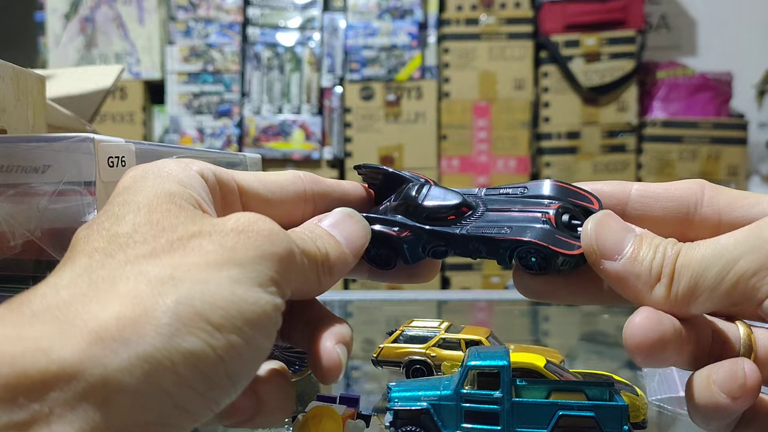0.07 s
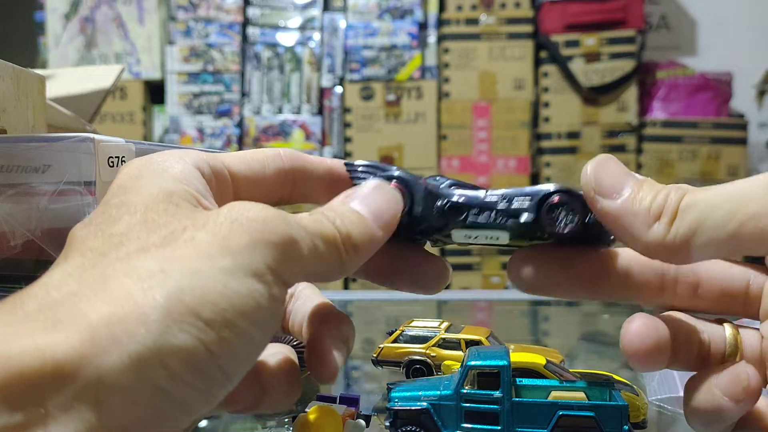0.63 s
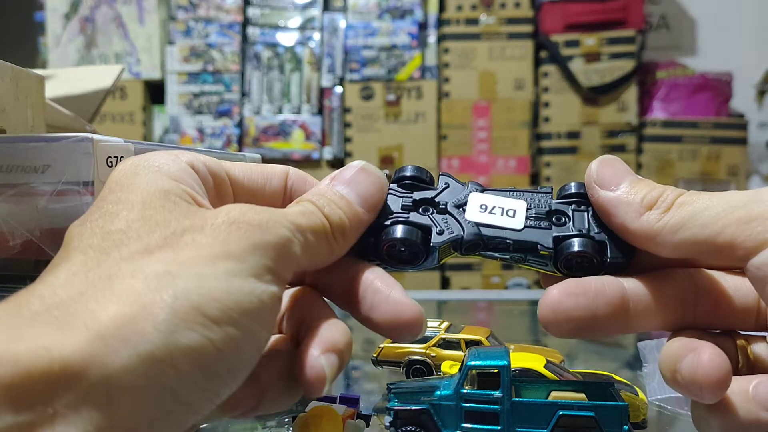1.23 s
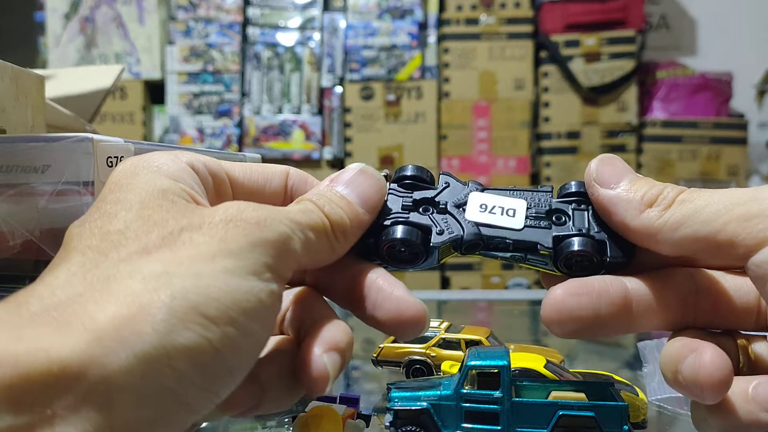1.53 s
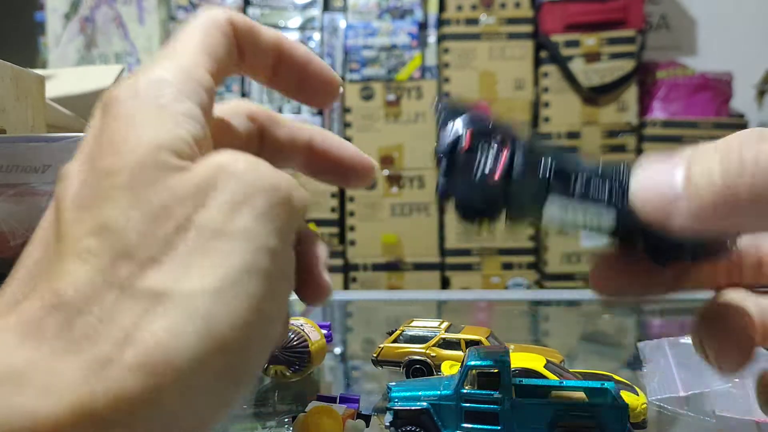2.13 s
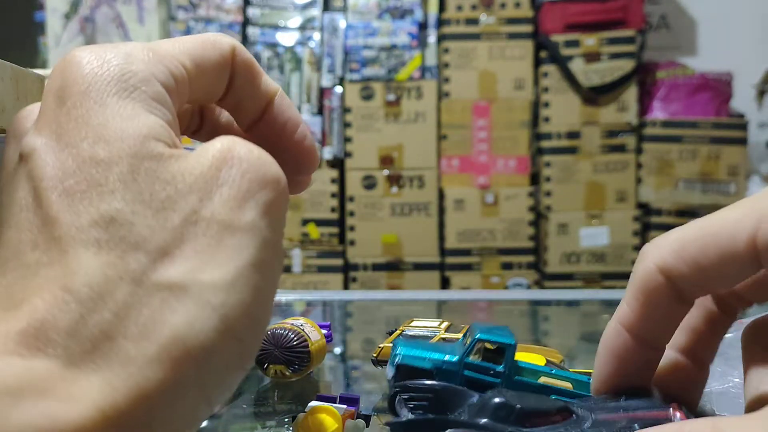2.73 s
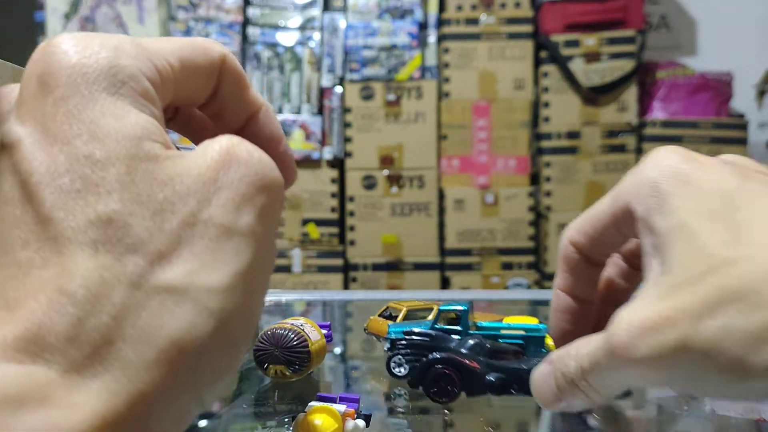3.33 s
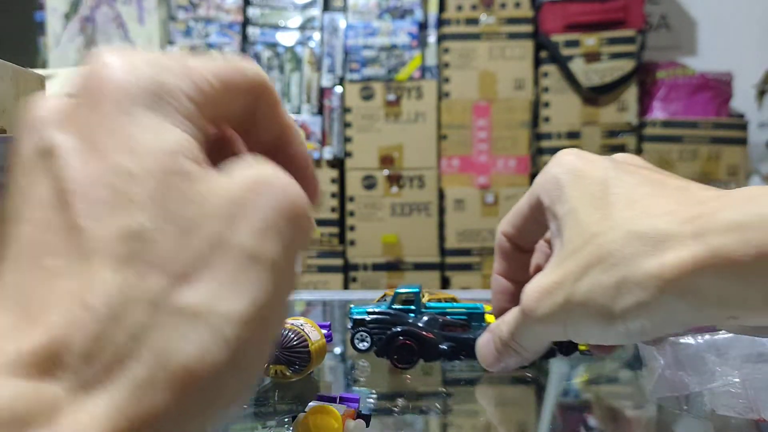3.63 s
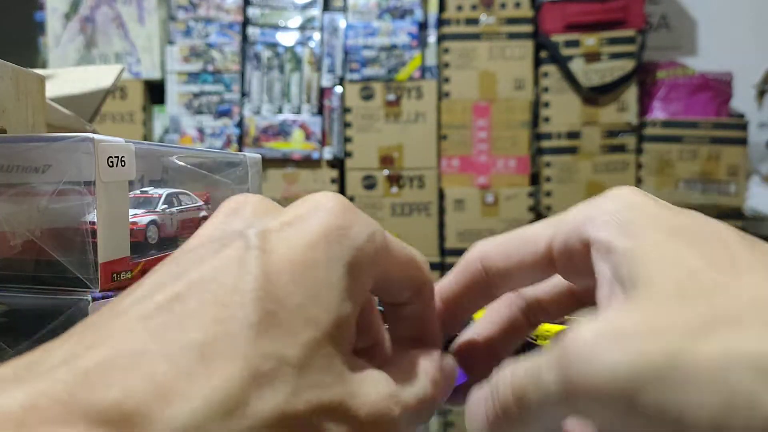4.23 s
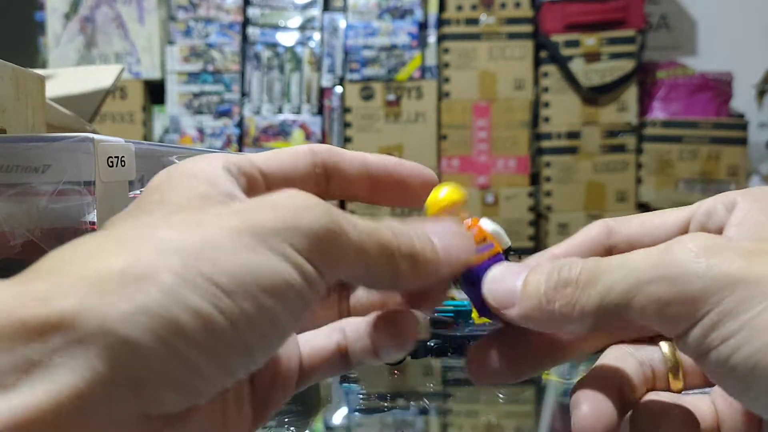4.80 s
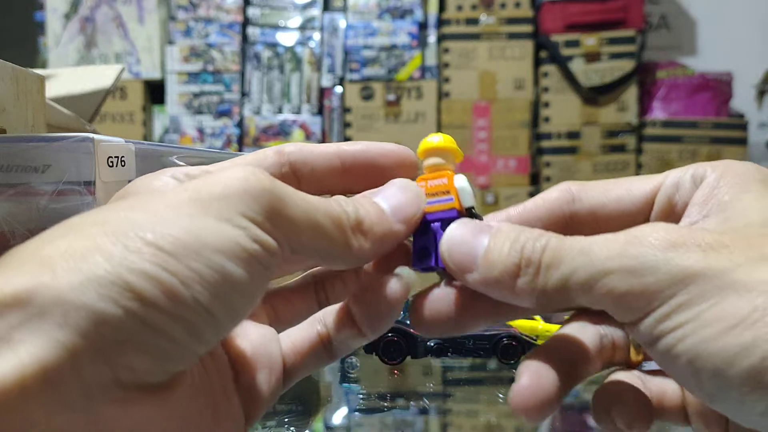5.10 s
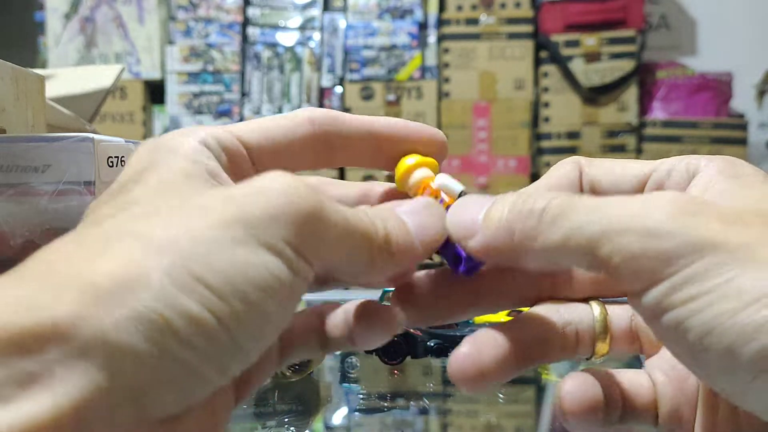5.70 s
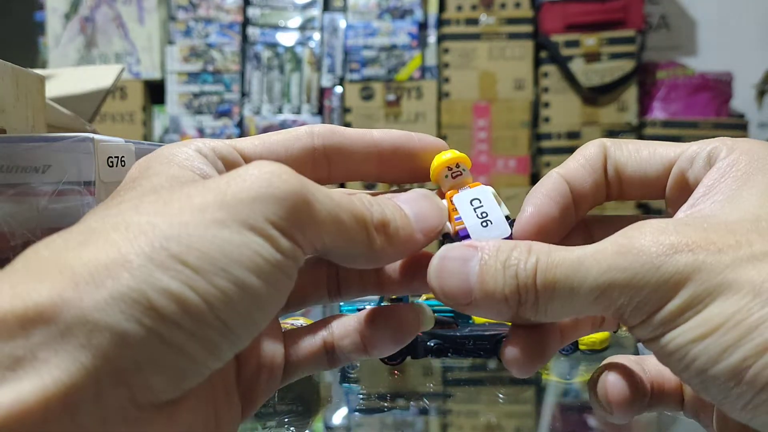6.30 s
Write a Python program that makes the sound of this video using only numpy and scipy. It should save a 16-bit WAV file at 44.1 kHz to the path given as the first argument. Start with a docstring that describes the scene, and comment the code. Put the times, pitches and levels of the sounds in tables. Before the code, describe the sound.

Sharp clicks and taps of a toy car set on glass, a few plastic ticks, and motorbikes puttering past outside.

```python
"""In a small shop, over the rumble of the town, fingers rub and tick against a diecast toy car.
Distant motorbikes putter by and a thin whine comes and goes. From 2.4 s the car is set on a glass shelf
and nudged into place: its metal body clashes and rings, loose wheels rattle and roll, the shelf thumps.
Near 3.9 s a plastic figure is picked up with a few light ticks. The exhaust pulses of a close motorbike
swell, pass at about 4.6 s and fade as more traffic draws near."""
import sys
import numpy as np
from scipy import signal
from scipy.fft import rfft, irfft
from scipy.io import wavfile
from scipy.ndimage import uniform_filter1d

SR = 44100
rng = np.random.default_rng(int(sys.argv[2]) if len(sys.argv) > 2 else 0)


def store_pcm(level_fs):
    """Save levels as 16-bit WAV."""
    pcm = np.round(np.clip(level_fs, -1, 1) * 32767).astype(np.int16)
    wavfile.write(sys.argv[1], SR, np.atleast_2d(pcm).T)


N = 288855
TIME, FREQ_HZ = np.arange(N) / SR, np.fft.rfftfreq(N, 1 / SR)


def gain_of(db):
    return 10 ** (np.asarray(db) / 20)


def unit_rms(x):
    return x / np.sqrt(np.mean(x ** 2) + 1e-20)


def pan(left_db):
    return gain_of(np.array([[left_db], [-left_db]]) / 2)


def at_hz(points, hz):
    """Interpolates a table on a log-frequency axis."""
    f, value = np.transpose(points)
    return np.interp(np.log(hz + 1), np.log(f + 1), value)


def envelope(rows):
    """Gain curve through (s, dB) points, silent outside their span."""
    s, db = np.transpose(rows)
    gate = 1. * ((TIME >= s[0] - .04) & (TIME <= s[-1] + .04))
    return gain_of(np.interp(TIME, s, db)) * uniform_filter1d(gate, size=2000)


def add(mix, start_s, sound):
    part = mix[:, max(round(start_s * SR), 0):][:, :sound.shape[1]]
    part += sound[:, :part.shape[1]]


def coloured(x, colour):
    """Filters x by a (Hz, dB) table; rms 1."""
    return unit_rms(irfft(rfft(x) * gain_of(at_hz(colour, FREQ_HZ)), N))


def minimum_phase(db):
    """Shortest impulse response with this gain over the rfft bins."""
    log_gain = np.log(gain_of(np.r_[db, db[-2:0:-1]]))
    return np.fft.ifft(np.exp(np.conj(signal.hilbert(log_gain)))).real


def wander(cutoff_hz):
    """Slow random drift; rms 1."""
    return unit_rms(irfft(rfft(rng.standard_normal(N)) / (1 + (FREQ_HZ / cutoff_hz) ** 4), N))


def passing(nearest_s, away_s, db, falloff=1.72):
    """Gain of a passing vehicle; screened by the shop front, it drops as distance ** -falloff."""
    return gain_of(db) / np.hypot(1, (TIME - nearest_s) / away_s) ** falloff


def power_sum(passes):
    return np.sqrt(sum(passing(*row) ** 2 for row in passes))


def heading(nearest_s, away_s):
    """-1 approaching, 0 beside the shop, 1 leaving."""
    return (TIME - nearest_s) / np.hypot(away_s, TIME - nearest_s)


# Diffuse field. Each row: frequency in Hz, left-right coherence.
COHERENCE = [(100, 1), (300, 0.97), (640, 1), (1400, 0.29), (3000, 0.015), (7000, 0.084)]
def diffuse_noise(colour):
    """Noise alike at both microphones in the bass, less so above."""
    left, other = rfft(rng.standard_normal((2, N)))
    same = np.clip(at_hz(COHERENCE, FREQ_HZ), -1, 1)
    right = same * left + np.sqrt(1 - same ** 2) * other
    return coloured(irfft(np.array([left, right]), N), colour)


# Rumble spectrum. Each row: frequency in Hz, relative density in dB.
RUMBLE_SPECTRUM = [(20, -47), (40, -44), (55, -18), (85, -11.5), (125, 1), (160, -9.5), (240, -10),
                   (330, -20), (500, -26), (1000, -119.5)]
def town_rumble():
    """The town's constant, slightly wavering bass."""
    return diffuse_noise(RUMBLE_SPECTRUM) * gain_of(-48 + 1.5 * wander(4.4))


# Roar spectrum. Each row: frequency in Hz, relative density in dB.
ROAR_SPECTRUM = [(150, 1.5), (280, 7), (450, 3), (700, -1.5), (1200, -5), (1900, -9), (2600, -8.5),
                 (3300, -20.5), (4000, -60), (8000, -20), (11000, -51)]
def traffic_roar():
    """A constant floor plus a broad swell of traffic around the near bike."""
    swell = np.hypot(gain_of(-55), passing(nearest_s=4.46, away_s=2.52, db=-50.5))
    return diffuse_noise(ROAR_SPECTRUM) * swell * gain_of(0.75 * wander(20))


# Approaching traffic. Each row: time in seconds, level in dB.
FOLLOWING_LEVELS = [(2.8, -84), (4.2, -55), (6.55, -51.5)]
# Its spectrum. Each row: frequency in Hz, relative density in dB.
FOLLOWING_SPECTRUM = [(200, 1), (310, -9), (420, 2), (560, 3.5), (780, -0.5), (1050, -6), (1600, -30),
                      (3000, -36)]
def following_traffic():
    """Traffic draws nearer behind the near bike."""
    return diffuse_noise(FOLLOWING_SPECTRUM) * envelope(FOLLOWING_LEVELS) * gain_of(1.1 * wander(11))


# Distant vehicles. Each row: nearest time in seconds, time to draw away in seconds, level in dB.
TYRE_PASSBYS = [(1.9, 0.61, -55.5), (5.8, 3.8, -57.5)]
# Tyre spectrum. Each row: frequency in Hz, relative density in dB.
TYRE_SPECTRUM = [(700, -20), (1400, -2), (1950, 2), (2600, -2), (3500, -7.5), (4100, -15), (6000, -8.5),
                 (9000, -60)]
def tyres():
    """Road noise swells and fades with each vehicle."""
    return diffuse_noise(TYRE_SPECTRUM) * power_sum(TYRE_PASSBYS) * gain_of(1.3 * wander(21))


# Whine partials. Each row: frequency in Hz, relative level in dB.
WHINE_TONES = [(1855, 3), (3690, 0)]
# Whine envelope. Each row: time in seconds, level in dB.
WHINE_LEVELS = [(1.15, -95), (1.3, -65), (1.43, -73), (1.53, -63), (1.75, -82), (2.4, -61)]
def whine():
    """A thin, rough whine from the street that keeps breaking up."""
    phase_per_hz = 2 * np.pi * np.cumsum(1 + 0.0133 * wander(90)) / SR
    tones = sum(gain_of(db + 2.5 * wander(35)) * np.sin(hz * phase_per_hz) for hz, db in WHINE_TONES)
    return envelope(WHINE_LEVELS) * unit_rms(tones)


def count_firings(rate_hz, jitter):
    """Running firing count of a slightly uneven engine."""
    return np.cumsum(rate_hz * (1 + jitter * wander(12.25))) / SR


def exhaust(firings, orders, waver_db, smear, drift_rad):
    """Pulses smeared by the street; as the bike moves, each order wavers in level and phase."""
    note = np.zeros(N)
    for order, db in orders:
        gain = gain_of(db + waver_db * wander(2.5))
        phase = 2 * np.pi * order * firings - smear * (order - 5) ** 2 + drift_rad * wander(0.83)
        note += gain * np.cos(phase)
    return unit_rms(note)


# Distant bikes. Each row: nearest time in seconds, time to draw away in seconds, firing rate in Hz,
# Doppler shift as a fraction, engine level in dB, relative hiss level in dB.
FAR_PASSBYS = [(.4, 0.37, 25, 0.0062, -53, -68.5), (1.85, 0.43, 31.3, 0.02018, -45, -59.5),
               (3.001, 0.419, 38.6, .055, -41, -48.5)]
# Their exhaust inside the shop. Each row: frequency in Hz, relative level in dB.
FAR_SPECTRUM = [(50, -2), (63, -1.5), (78, -4), (95, 5.5), (118, 1.5), (155, 1), (195, -11.5), (235, -3),
                (275, -18.5), (312, -6), (350, -13.5)]
def far_bikes():
    """Each engine swells, drops in pitch and fades; orders near the shop's boom stand out."""
    mix = np.zeros(N)
    for nearest_s, away_s, rate_hz, doppler, db, _ in FAR_PASSBYS:
        firings = count_firings(rate_hz * (1 - doppler * heading(nearest_s, away_s)), jitter=0.0123)
        orders = [(k, at_hz(FAR_SPECTRUM, k * rate_hz)) for k in range(2, 10)]
        note = exhaust(firings, orders, waver_db=1.5, smear=0.63, drift_rad=0.77)
        mix += note * passing(nearest_s, away_s, db)
    return mix


# Hiss spectrum. Each row: frequency in Hz, relative density in dB.
HISS_SPECTRUM = [(500, 8), (1300, 6), (2200, 5.5), (3200, 1), (4100, -10.5), (5200, -3), (6500, 3.5),
                 (8100, 0.5), (9300, -8), (11000, -16.5), (13000, -19.5), (15300, -16.5)]
def bike_hiss(near_firings, nearest_s=4.637, away_s=0.57):
    """Hiss of all the passing bikes, throbbing a little with the near engine."""
    passes = [(nearest_s, away_s, -41.5)] + [(s, away, db) for s, away, *_, db in FAR_PASSBYS]
    throb_db = 0.3 * np.cos(2 * np.pi * near_firings)
    return diffuse_noise(HISS_SPECTRUM) * power_sum(passes) * gain_of(-2 + 0.9 * wander(21) + throb_db)


# Near exhaust. Each row: multiple of the firing rate, level within its band in dB.
NEAR_ORDERS = [(1, -29), (2, -6.5), (3, -3), (4, 0.5), (5, -1.5), (6, -4), (7, -5.5), (8, -12.5), (9, -14),
               (10, -18), (11, -24.5)]
# Its pass. Each row: time in seconds, then bass, middle and top band levels in dB.
NEAR_LEVELS = [ (0, -88, -86, -83), (3.3, -66, -55, -68), (3.78, -45, -40, -62), (4.02, -44.5, -42.5, -43),
               (4.16, -43, -42, -42.5), (4.31, -42, -30.5, -42), (4.48, -36, -28.5, -49),
               (4.62, -39, -31, -44), (4.78, -35, -31.5, -47), (4.92, -40, -31, -53.5),
               (5.15, -46, -40.5, -50.5), (5.42, -43.5, -39.5, -48.5), (5.8, -48, -46, -58.5),
               (6.55, -54, -47.5, -60)]
def near_bike(firings):
    """Bright as it comes, deep as it goes by; the firings vary in strength."""
    s, *bands_db = np.transpose(NEAR_LEVELS)
    bands = NEAR_ORDERS[:3], NEAR_ORDERS[3:7], NEAR_ORDERS[7:]
    note = np.zeros(N)
    for orders, db in zip(bands, bands_db):
        band = exhaust(firings, orders, waver_db=2.36, smear=0.351, drift_rad=0.6)
        note += band * gain_of(np.interp(TIME, s, db))
    return note * gain_of(0.59 * wander(30))


def street():
    """Engines over traffic noise; the street lies to the left, so the right side hears it later."""
    near_rate_hz = 32.75 * (1 - .023 * heading(nearest_s=4.95, away_s=.4))
    firings = count_firings(near_rate_hz, jitter=0.0048)
    background = far_bikes() + town_rumble() + traffic_roar() + following_traffic() + tyres()
    left, right = background + bike_hiss(firings) + near_bike(firings) + whine()
    return np.array([left, np.roll(right, 14)])


# Room decay. Each row: frequency in Hz, T60 in seconds.
SHOP_T60 = [(200, 0.15), (1000, 0.87), (2500, 0.44), (6500, 0.38), (9000, 0.29), (12000, 0.47),
            (16000, 0.29)]
def reflections():
    """Sparse echoes from shelves and boxes, each band dying at its own speed."""
    taps = np.zeros((2, SR))
    slots = np.arange(180, SR - 12, 12)
    delays = slots + rng.integers(0, 12, (2, len(slots)))
    np.put_along_axis(taps, delays, rng.choice([-1., 1.], delays.shape), 1)
    hz, t, spectra = signal.stft(taps, SR, nperseg=256)
    colour_db = at_hz([(200, -5.0), (2500, 1.0), (8500, 1.5), (11500, -4.5)], hz)[:, None]
    decay_db = 60 * t / at_hz(SHOP_T60, hz)[:, None]
    tail = signal.istft(spectra * gain_of(colour_db - decay_db), SR, nperseg=256)[1]
    return tail / np.linalg.norm(tail[0])


def shop_echo(x, wet_db, swap_hz=3):
    """Moving hands keep changing the paths into the room: two echo patterns take turns."""
    phase = 2 * np.pi * swap_hz * TIME
    shares = np.cos(phase), np.sin(phase)
    wet = sum(signal.fftconvolve(x * share, reflections(), axes=1)[:, :N] for share in shares)
    return gain_of(wet_db) * wet


def strokes(rows, attack_s, release_s):
    """Each stroke of the hand builds up, holds and dies away."""
    pressure = np.zeros(N)
    for start_s, length_s, db in rows:
        rise = np.clip((TIME - start_s) / attack_s, 0, 1)
        fall = np.exp(-np.maximum(TIME - start_s - length_s, 0) / release_s)
        pressure += gain_of(db) * rise * fall
    return pressure


def decay_tails(impulses, decay_s):
    return signal.lfilter([1], [1, -np.exp(-1 / (decay_s * SR))], impulses)


def friction(colour, slips_per_s, spread_db):
    """Many tiny slips of uneven size, each a short burst of noise."""
    slips = (rng.random(N) < slips_per_s / SR) * gain_of(spread_db * np.minimum(rng.exponential(1, N), 3))
    bursts = np.sqrt(decay_tails(slips ** 2, decay_s=0.003))
    noise = rng.standard_normal(N) + 0.82 * rng.standard_normal((2, N))
    return coloured(bursts * noise, colour)


# Finger strokes. Each row: start in seconds, length in seconds, level in dB.
RUB_STROKES = [(.39, 0.076, -62), (.86, 0.073, -55)]
# Rub spectrum. Each row: frequency in Hz, relative density in dB.
RUB_SPECTRUM = [(800, -11), (2500, 8), (3400, -9), (4400, 0), (5500, -3), (7000, 1), (10000, -6),
                (12500, -30), (15000, -1)]
def finger_rubs():
    """Fingertips rub the toy as they turn it."""
    pressure = strokes(RUB_STROKES, attack_s=0.059, release_s=0.017)
    return friction(RUB_SPECTRUM, slips_per_s=550, spread_db=3) * pressure * pan(-3)


# Nudges. Each row: start in seconds, length in seconds, level in dB.
PUSH_STROKES = [(2.76, 0.014, -50), (2.84, 0.045, -43), (2.96, 0.08, -46.5), (3.155, 0.087, -50.5),
                (3.35, 0.018, -51), (3.42, 0.18, -51)]
# Rolling spectrum. Each row: frequency in Hz, relative density in dB.
ROLL_SPECTRUM = [(300, -3), (1100, 9), (2000, 13.5), (2600, 17.5), (4000, 7), (5500, 5), (6600, 14),
                 (7600, -39), (9000, -28), (11000, -39), (15000, -26)]
def wheel_rolls():
    """Wheels and body roll and slide on the glass, push by push."""
    pressure = strokes(PUSH_STROKES, attack_s=0.0064, release_s=0.033)
    return friction(ROLL_SPECTRUM, slips_per_s=290, spread_db=2) * pressure * pan(0.5)


def ringing(modes, t, scatter_rad):
    """Dying sines, each reaching the two microphones with its own phase."""
    return sum(gain_of(db - 60 * t / t60)
               * np.sin(2 * np.pi * hz * t + scatter_rad * rng.standard_normal((2, 1)))
               for hz, db, t60 in modes)


def rattle(t, db, rebounds_per_s=170, t60_s=.25):
    """Envelope of loose wheels and axles rebounding after a blow."""
    rebounds = (rng.random(len(t)) < rebounds_per_s / SR) * rng.random(len(t))
    return decay_tails(rebounds * gain_of(db - 60 * t / t60_s), decay_s=0.0014)


def crack(contact, colour, ring_hz, resonance_db, tilt_db, width):
    """Noise of clashing parts, coloured by the material and the struck part's resonance."""
    noise = rng.standard_normal(len(contact)) + width * rng.standard_normal((2, len(contact)))
    hz = np.fft.rfftfreq(1024, 1 / SR)
    peak_db = resonance_db / (1 + ((hz / ring_hz - 1) / 0.032) ** 2)  # half-width 3.2 %
    slope_db = tilt_db * np.log2(np.maximum(hz, 1000) / 6000)
    response = minimum_phase(at_hz(colour, hz) + peak_db + slope_db)
    burst = signal.fftconvolve(noise * contact, response[None], axes=1)[:, :len(contact)]
    return burst / np.sqrt((burst ** 2).sum(1, keepdims=True) / 10)


# Modes of car and glass. Each row: frequency in Hz, relative level in dB, T60 in seconds.
BODY_MODES = [(1890, -36, 0.27), (2150, -27.5, 0.08), (2420, -42, 0.18), (2870, -47, 0.25), (3170, -44, .2),
              (3580, -41, 0.25), (4700, -37.5, .24), (5230, -51, 0.33), (5640, -29, 0.37),
              (6460, -35, 0.22), (6700, -42, 0.23), (7900, -42, 0.3), (7960, -36, .28), (9100, -48, 0.22)]
# Dull bending modes of the shelf. Each row: frequency in Hz, relative level in dB, T60 in seconds.
SHELF_MODES = [(122, -16.5, 0.22), (208, -11, 0.1), (240.6, -7.5, 0.13), (304, -5, 0.043),
               (345, -13.5, 0.05)]
def blow(row, colour, body_db, ring_cycles, rise_s, width, resonance_db, rattle_db):
    """Parts clash and rattle; the struck part rings briefly, the body sings on, the shelf thumps."""
    db, ring_hz, tilt_db, thump_db, ring_db, clash_ms = row
    t = np.arange(16384) / SR
    onset = 1 - np.exp(-(t / rise_s) ** 2)
    clash = onset * np.exp(-t * 1000 / clash_ms)
    contact = clash / clash.max() + rattle(t, rattle_db)
    burst = crack(contact, colour, ring_hz, resonance_db, tilt_db, width)
    # grip and contact point shift and reweight the modes at every blow
    modes = np.array(BODY_MODES, float)
    modes[:, 0] *= 1 + .002 * rng.standard_normal(len(modes))
    modes[:, 1] += 3 * rng.standard_normal(len(modes))
    ring = ringing([(ring_hz, ring_db, ring_cycles / ring_hz)], t, scatter_rad=0.36)
    body = gain_of(body_db) * ringing(modes, t, scatter_rad=3.4)
    thump = gain_of(thump_db) * ringing(SHELF_MODES, t, scatter_rad=0.17)
    return gain_of(db) * (burst + onset * (ring + body + thump))


# Plastic spectrum. Each row: frequency in Hz, relative density in dB.
PLASTIC_SPECTRUM = [(200, -19), (900, -10), (2000, -12), (4000, -17.5), (7000, 0.5), (9500, -5),
                    (13000, -9.5), (14500, -12), (16000, 2)]
# Light taps. Each row: start in seconds, relative level in dB, ring in Hz, treble tilt in dB per
# octave, thump and ring in dB re the tap, clash decay in ms.
PLASTIC_TICKS = [ (0.418, -45, 7740, 0, -25, 1, 4.7), (0.45, -43, 7640, -3, -25, -1, 3),
                 (0.82, -40, 7700, 11, -27, -8, 0.6), (0.969, -39.5, 6200, -3, -22, -8, 2.7),
                 (3.842, -31.5, 8000, -3, -27, -11, 3.5), (3.8813, -30, 9600, 6, -13, -3, 1.2),
                 (3.8935, -24, 7860, 0, -30, -3, 2.5), (3.8979, -12, 6900, 2, -22, -8.5, 2),
                 (3.8997, -22, 1010, -10, -10, -30, 5.5), (3.9541, -34, 7860, -2, -15, 6, 3),
                 (4.185, -29.5, 1930, -15, -5.5, -7, 2.2), (4.187, -28.5, 14500, 8, -27, -3, 1.3),
                 (4.193, -33.5, 1980, -12, -2, -4, 4)]
def plastic_ticks():
    """Plastic and fingertips tap: a sharp onset, little ring."""
    mix = np.zeros((2, N))
    for start_s, *row in PLASTIC_TICKS:
        add(mix, start_s, blow(row, PLASTIC_SPECTRUM, body_db=-22, ring_cycles=29, rise_s=0.00017,
                               width=11, resonance_db=1.5, rattle_db=-26))
    return gain_of(2) * mix


# Metal spectrum. Each row: frequency in Hz, relative density in dB.
METAL_SPECTRUM = [(200, -44), (900, -7.5), (1400, -7), (2400, 3), (3200, -0.5), (4100, -3), (4700, -1.5),
                  (5600, -1.5), (6600, 1), (7300, -3.5), (8100, -1.5), (9300, -6.5), (10500, -18),
                  (13000, -20), (14600, -16), (16000, -15)]
# Knocks of the car. Each row: start in seconds, relative level in dB, ring in Hz, treble tilt in dB
# per octave, thump and ring in dB re the knock, clash decay in ms.
CAR_KNOCKS = [ (0.462, -40, 2613, 4, -8, -5, 2), (2.019, -48, 8200, 4, -20, -3, 2),
              (2.0528, -41.5, 4600, -2, 1, -4, 1.7), (2.4445, -24, 8800, -1, -32, -10, 1.5),
              (2.4486, -16, 6740, 1, -28, -25, 2.4), (2.553, -35, 2130, -4, -18, -13, 7),
              (2.6154, -26, 6800, -1.5, -12, -2.5, 2.2), (2.6353, -29, 5270, -2, -6.5, -13, 3.5),
              (2.651, -43, 3000, -7, -9, 0.5, 4), (2.7415, -43, 6500, 0, -15, -10, 1.7),
              (2.7757, -36.5, 2570, 0, -18, -6, 2.5), (2.803, -48, 3080, 2, -15, 9, 4),
              (2.8253, -23.5, 5730, -4, -15, -2.5, 4.5), (2.8419, -29, 5500, -2, -19, -8, 2.5),
              (2.8475, -27.5, 6600, -2, -7, -10, 3.5), (2.8582, -10, 6570, 3, -12.5, -2.5, 2),
              (2.8854, -17.5, 5170, -1, -16, -12, 3.4), (2.902, -33, 6260, -2, -16, -6, 4),
              (2.921, -38, 2390, 2, 0, 6, 4.5), (2.9488, -10, 4580, 1.5, -13, -17, 4.1),
              (2.9607, -26, 6560, -1, -17, 1, 3), (3.008, -11.5, 6800, 2.5, -16, -3, 0.95),
              (3.0183, -29, 5300, -3, -20, -8, 2.3), (3.0353, -20, 6660, -2, -19, -9, 4.3),
              (3.0423, -29, 2360, 0, -21, -15, 2.5), (3.051, -24, 5950, -3, -21, -2, 3.5),
              (3.1085, -30.5, 6400, -2, -18, -13, 1.9), (3.123, -37, 6600, -4, -16, -4, 2),
              (3.161, -32, 2390, -5.5, -11, -17, 5.5), (3.2274, -44, 2460, -6, -3, -2, 6.2),
              (3.286, -35, 8000, 0, -22, -9, 2), (3.3496, -30, 7100, 2, -5, -13, 3.1),
              (3.357, -29, 5830, -2, -14, -4, 4), (3.367, -29, 2430, -6.5, -11, -16, 6),
              (3.429, -43, 6600, -2, -13, -8, 4), (3.441, -31, 2560, -1.5, -4, -3, 5.6),
              (3.4797, -33.5, 6780, -1, -26, -0.5, 2.5), (3.6442, -27, 3360, -1.5, -26, -14, 2.2)]
def car_knocks():
    """The metal car clicks, chatters and rings, in the hand and on the glass."""
    mix = np.zeros((2, N))
    for start_s, *row in CAR_KNOCKS:
        add(mix, start_s, blow(row, METAL_SPECTRUM, body_db=-4, ring_cycles=83, rise_s=0.0011,
                               width=2.2, resonance_db=4.5, rattle_db=-21))
    return gain_of(2.5) * mix * pan(-0.2)


def scene():
    """Close toys, the small room behind them, the street outside."""
    toys = wheel_rolls() + finger_rubs() + car_knocks() + plastic_ticks()
    return toys + shop_echo(toys, wet_db=-9.5) + street()


# Microphone port imbalance. Each row: frequency in Hz, left over right in dB.
PORT_BALANCE = [(100, 1), (800, 0.2), (1600, 2.5), (4200, 2), (6200, 7.5), (7000, 9.5), (7900, -40),
                (8600, -3.5), (9700, -8), (11500, -2), (15000, 4)]
def record(dry, cutoff_hz=16000):
    """The two ports ring at different pitches and colour their sides; a low-pass follows."""
    balance_db = at_hz(PORT_BALANCE, FREQ_HZ)
    sides = gain_of(np.array([balance_db, -balance_db]) / 2)
    heard = irfft(rfft(dry) * sides / np.sqrt((sides ** 2).mean(0)), N)
    lowpass = signal.firwin(255, cutoff_hz, window=("kaiser", 9), fs=SR)
    return signal.oaconvolve(heard, lowpass[None], "same")


dry = scene()
out = record(dry)
store_pcm(out)
```